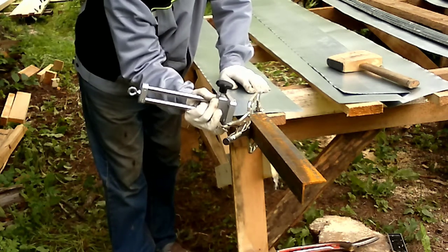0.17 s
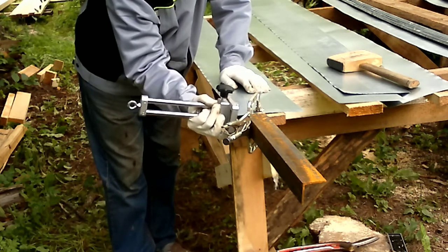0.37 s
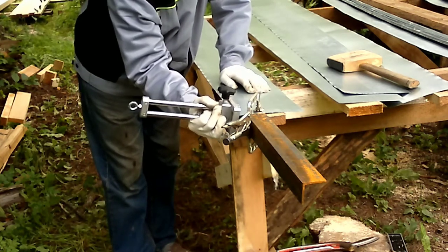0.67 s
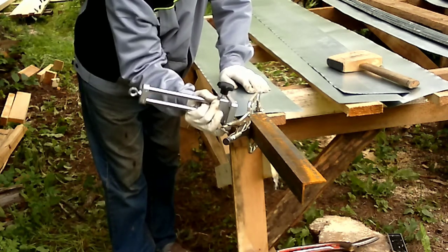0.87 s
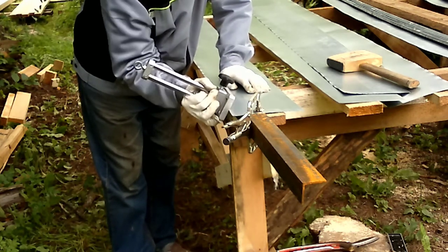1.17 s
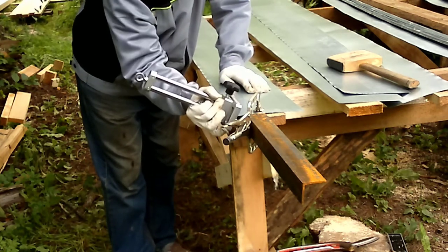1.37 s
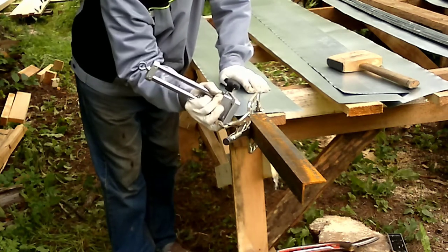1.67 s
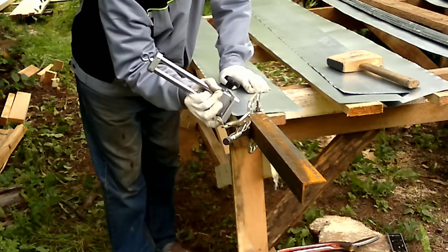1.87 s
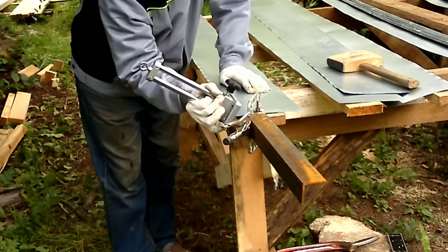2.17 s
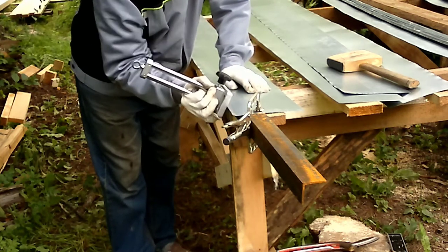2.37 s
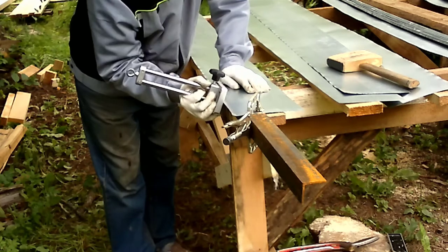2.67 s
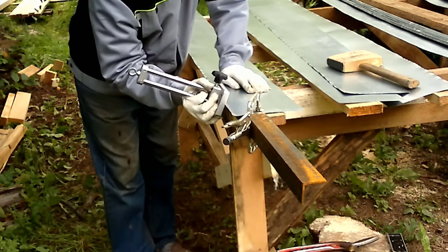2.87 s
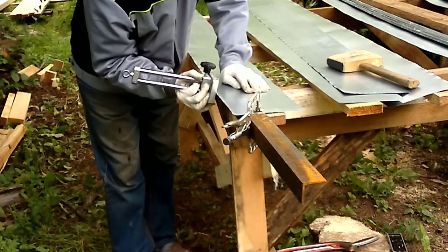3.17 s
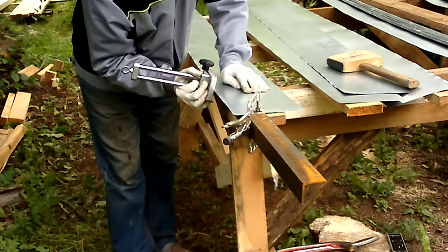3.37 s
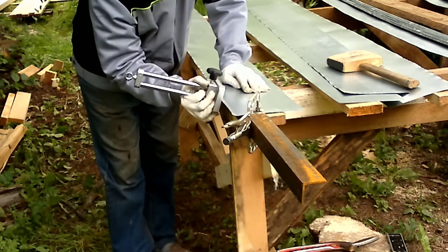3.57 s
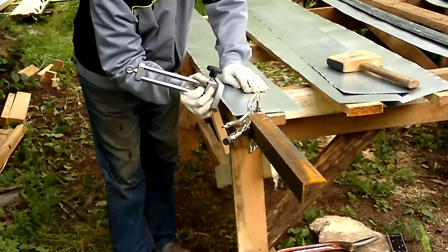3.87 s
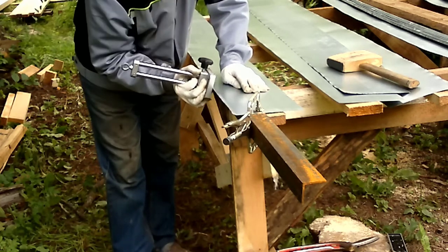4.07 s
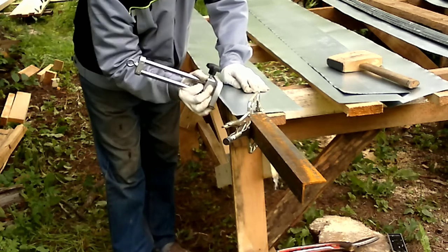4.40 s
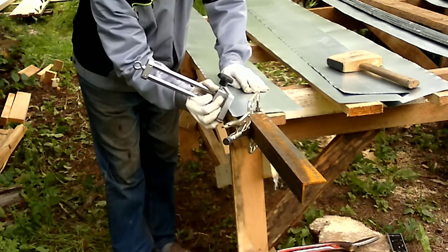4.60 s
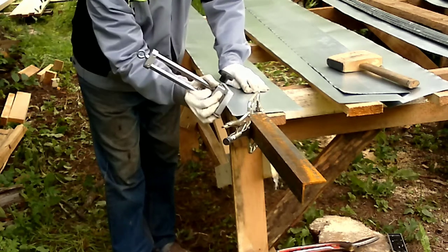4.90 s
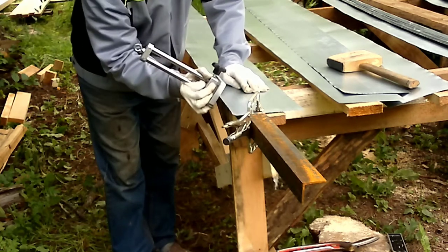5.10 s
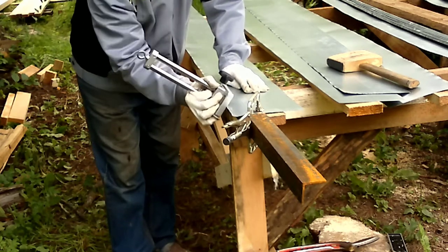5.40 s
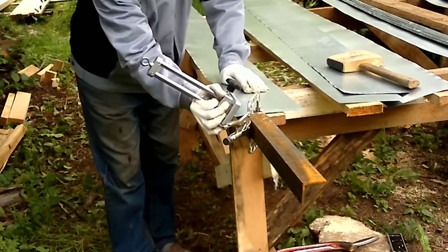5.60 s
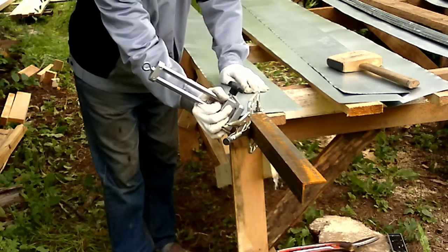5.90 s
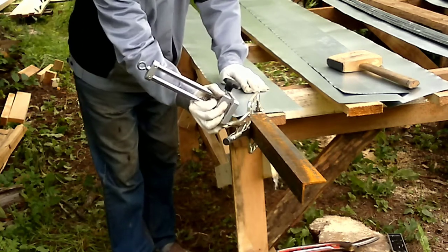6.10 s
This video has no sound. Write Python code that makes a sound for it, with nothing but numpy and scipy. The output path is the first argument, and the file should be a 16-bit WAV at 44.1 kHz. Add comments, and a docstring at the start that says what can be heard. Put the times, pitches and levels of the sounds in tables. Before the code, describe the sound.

Short, irregular scrapes sound up close as steel rollers bend the edge of a hand-damped metal sheet in the open air. The sheet knocks and the tool clicks with small, bright rings. After the lighter opening strokes the edge chafes hoarsely, then firmer pushes follow, with one low wind thump on the microphone. A sharp, ringing click marks the final stroke, over a steady faint hiss and low wind.

```python
"""An outdoor bench, one microphone close by: a hand roller bender works along a roofing sheet's edge.
Light wind rumbles under a soft hiss throughout. From 0.2 s the rollers rasp over the hand-damped sheet
in short strokes; the edge gives way in knocks and the tool's steel ticks and rings. Near 2.4 s the edge
chafes hoarsely on a roller flange. Harder pushes follow from 3.5 s, with a low wind thump at 4.3 s.
The last stroke, at 6.1 s, brings the loudest ring of the rollers."""
import sys
import numpy as np
from scipy import signal
from scipy.fft import rfft, irfft
from scipy.io import wavfile
from scipy.ndimage import uniform_filter1d

SR = 44100
rng = np.random.default_rng(int(sys.argv[2]) if len(sys.argv) > 2 else 0)


def master_out(mix):
    """Clip the mix to full scale and print it as 16-bit PCM to the path in sys.argv[1]."""
    frames = np.transpose(np.atleast_2d(mix))
    ceiling = np.clip(frames, -1, 1)
    pcm = np.round(ceiling * 32767).astype(np.int16)
    wavfile.write(sys.argv[1], SR, pcm)


N = 275625
TIME = np.arange(N) / SR

# open air around the bench: (frequency [Hz], level [dB per Hz])
AIR_SPECTRUM = [(100, 6.5), (200, 12.5), (480, 10.5), (700, 8), (1200, 2.5), (2300, -2), (5200, -5),
                (10000, -7.5), (15500, -13)]
# its hiss grows a little, then holds: (time [s], level [dB])
AIR_LEVELS = [(0, -62.5), (3.7, -58.5), (6.25, -58.5)]
# low wind: (frequency [Hz], level [dB per Hz])
WIND_SPECTRUM = [(12, -13), (25, -4.5), (47, -3.5), (70, -2.5), (112, -12.5), (200, -19.5), (500, -54),
                 (2000, -78)]
# low thumps of wind on the microphone: (time [s], level [dB], pitch [Hz], length [s])
WIND_THUMPS = [(1.917, -41.5, 44.5, 0.058), (4.304, -31.5, 39, 0.052)]
# the hand-damped sheet: (frequency [Hz], level [dB per Hz])
SHEET_SPECTRUM = [(46, -7.5), (96, -15), (186, -6), (390, -11.5), (475, -1), (765, -5.5), (905, -1.5),
                  (1760, -5), (2350, -7), (2700, -17), (3460, -19.5), (4360, -26.5), (6450, -33),
                  (15400, -46)]
# its strongest modes: (frequency [Hz], width [Hz], height [dB])
SHEET_RESONANCES = [(535, 45, 3), (671, 55, 5), (925, 40, 3), (1012, 42, 2), (1238, 52, 2), (1448, 62, 3),
                    (1658, 25, 3), (1760, 60, 2), (1937, 42, 3), (2255, 42, 4), (2528, 60, 3),
                    (2933, 80, 4)]
# the resonance that a sharp knock favours: (frequency [Hz], width [Hz], height [dB])
KNOCK_RESONANCE = [(1750, 1000, 8)]
# the tool's frame: (frequency [Hz], level [dB per Hz])
FRAME_SPECTRUM = [(1500, -52), (2880, -5), (3500, -14), (4000, 3.5), (4500, 7.5), (4880, -2), (5250, -3.5),
                  (5680, -4), (6380, -15), (8200, -8.5), (15400, -48)]
# its modes: (frequency [Hz], width [Hz], height [dB])
FRAME_RESONANCES = [(3800, 45, 3.4), (4500, 28, 4), (4330, 13, 3.1), (4330, 25, 3.7), (4650, 98, 6.3),
                    (4930, 60, 4.4)]
# a hard crack on steel: (frequency [Hz], level [dB per Hz])
CRACK_SPECTRUM = [(310, -76), (1250, 10.5), (3150, -8), (4450, -5.5), (6250, -10.5), (7050, -1.5),
                  (7850, -5.5), (9080, 2), (10050, -5), (11100, -18), (13100, -44), (16100, -16)]
# modes of the steel rollers: (frequency [Hz], level [dB], t60 before contact damping [s])
ROLLER_MODES = [(4255, -20, .13), (4525, -18, .12), (5577, -22, .09), (8560, -13, .06), (8638, -16, .1),
                (8912, -16, .09), (9049, 0, .062), (9054, -17, .17), (9110, -9, .04), (11650, -25, .07),
                (12710, -29, .08)]
# the edge drags on a flange: (time [s], length [s], start pitch [Hz], end pitch [Hz], level [dB])
FLANGE_CHAFES = [(0.824, 0.094, 1040, 1040, -54), (0.991, 0.037, 1840, 2000, -50),
                 (1.727, 0.073, 1670, 1970, -53), (2.312, 0.088, 1570, 1090, -39),
                 (2.404, 0.061, 1100, 930, -33), (2.683, 0.19, 1150, 1070, -65),
                 (3.119, 0.15, 2390, 1690, -51), (3.553, 0.042, 884, 1010, -32.5),
                 (4.62, 0.067, 1000, 820, -44.5), (4.943, 0.051, 880, 960, -49),
                 (5.329, 0.086, 1360, 1250, -36), (6.194, 0.03, 1390, 1280, -32)]
# steel meets steel in the tool: (time [s], relative level [dB], ring offset [dB])
STEEL_TICKS = [(0.2518, -34.5, -6), (0.9187, -25, 1.5), (0.9304, -37, 2), (0.9666, -37, 10),
               (1.3522, -31.5, -3), (1.3667, -35.5, -2), (1.6764, -29, 0), (1.711, -37, -3),
               (2.003, -42.5, -5), (2.2273, -26.5, 0.5), (2.243, -36, -8), (2.9748, -38.5, -3),
               (3.0893, -39.5, -7), (3.126, -39, -5), (3.528, -27.5, 3), (3.5756, -26, -3), (3.607, -34, 2),
               (3.6295, -28.5, 2), (3.666, -37.5, -7), (3.9408, -33, -9), (3.9628, -28.5, 2),
               (4.473, -30.5, 8), (5.3234, -37, -1), (5.3985, -28.5, -7), (5.4864, -26.5, -6),
               (5.4984, -24.5, 4.5), (5.564, -24.5, 4), (5.906, -41, -11), (6.0979, -16.5, 8.5),
               (6.1166, -19.5, 1), (6.15, -30, -4)]
# the edge gives way: (time [s], relative sheet level [dB], relative frame level [dB], sheet decay [s])
EDGE_KNOCKS = [(0.254, -34, -63, 0.011), (0.275, -43, -73, 0.0041), (0.858, -48.5, -70, 0.009),
               (0.92, -36, -38.5, 0.01), (0.93, -23.5, -54, 0.0061), (0.944, -25, -41, 0.0087),
               (0.974, -27.5, -62, 0.014), (1.356, -43, -58, 0.0045), (1.373, -32.5, -59, 0.0071),
               (1.678, -28, -40, 0.0063), (1.692, -23, -59, 0.018), (1.964, -45, -79, 0.0043),
               (1.983, -60, -70, 0.0055), (2.227, -27.5, -39, 0.0036), (2.243, -21.5, -39.5, 0.0073),
               (2.269, -38, -42.5, 0.0092), (2.289, -42, -50, 0.0065), (2.423, -26.5, -79, 0.019),
               (2.612, -41, -72, 0.01), (2.977, -39.5, -53, 0.006), (3.128, -27.5, -58, 0.012),
               (3.529, -27, -67, 0.02), (3.582, -32, -51, 0.0087), (3.61, -20.5, -59, 0.015),
               (3.628, -18.5, -46, 0.021), (3.902, -38, -60, 0.0043), (3.967, -20.5, -44.5, 0.02),
               (4.316, -35.5, -73, 0.015), (4.475, -23, -68, 0.01), (4.874, -50, -74, 0.0078),
               (5.503, -26, -36.5, 0.0094), (5.567, -38, -41.5, 0.006), (6.098, -33, -47, 0.01),
               (6.118, -17.5, -32.5, 0.013), (6.15, -42, -41, 0.0051), (6.166, -20, -69, 0.0078)]
# strokes of the rollers: (time of full grip [s], attack [s], hold [s], release [s], relative level [dB],
# swell over the hold [dB], sheet response at grip [Hz], sheet response at letting go [Hz])
ROLLER_PUSHES = [(0.217, .1, .055, 0.093, -44, 1, 860, 1070),
                 (0.922, 0.016, .057, .06, -32.5, 0, 1580, 1360),
                 (1.005, 0.018, 0.077, .3, -51.5, -2, 970, 735),
                 (1.307, .14, .08, .04, -42.5, 2.5, 1270, 1510),
                 (1.68, 0.012, 0.065, 0.08, -37, -6, 1250, 1750),
                 (1.973, 0.046, .057, .09, -45, -5, 1340, 1280),
                 (2.238, 0.022, 0.043, 0.089, -27, -3.5, 1660, 1810),
                 (2.363, 0.29, 0.082, .13, -39, 4.5, 1320, 1080),
                 (2.732, 0.15, 0.061, 0.091, -56.5, -0.5, 900, 920),
                 (2.997, .09, 0.068, 0.032, -44, 8, 1580, 1080),
                 (3.115, .14, .09, .12, -41, -6, 1700, 1930), (3.275, .15, 0.029, 0.16, -54, 1, 700, 640),
                 (3.569, .17, .095, .075, -30, -2, 1230, 1580),
                 (3.918, .08, .04, .05, -35, 1.5, 1320, 1350),
                 (3.97, 0.026, .14, 0.11, -28, -3.5, 1250, 1380),
                 (4.341, 0.081, .11, 0.11, -35.5, 2, 1300, 1360),
                 (4.494, 0.15, .168, 0.016, -27.5, -12, 1810, 1140),
                 (4.972, .12, .04, .11, -36, -5.5, 960, 1720),
                 (5.081, 0.053, 0.019, 0.11, -40.5, 0, 1520, 1470),
                 (5.34, 0.071, 0.11, 0.088, -39.5, -1.5, 1540, 1820),
                 (5.494, 0.11, 0.012, .07, -29, 2.5, 2100, 2080),
                 (5.569, 0.056, .008, 0.084, -36, -0.5, 1660, 1720),
                 (6.117, .016, 0.14, .1, -25, -12, 1880, 1290)]


def gain_of(db):
    """Decibels to amplitude."""
    return 10 ** (np.asarray(db) / 20)


def unit_rms(x):
    """Scales to rms 1."""
    return x / np.sqrt(np.mean(x ** 2) + 1e-20)


def add(mix, start_s, sound):
    """Lays a sound into the mix."""
    part = mix[max(round(start_s * SR), 0):][:len(sound)]
    part += sound[:len(part)]


def wobble(hz):
    """A smooth random curve of rms 1 that changes up to about hz times a second."""
    lowpass = np.exp(-(np.fft.rfftfreq(N, 1 / SR) / hz) ** 2)
    return unit_rms(irfft(rfft(rng.standard_normal(N)) * lowpass, N))


def body(spectrum, modes=(), size=8192):
    """Causal impulse response, of energy 1, with the given spectrum and resonances."""
    freqs = abs(np.fft.fftfreq(size, 1 / SR))
    knots_hz, levels = np.transpose(spectrum)
    db = np.interp(np.log(freqs + 1), np.log(knots_hz), levels)
    for hz, width, height in modes:
        db = db + height / (1 + (2 * (freqs - hz) / width) ** 2)
    minimum_phase = np.exp(signal.hilbert(np.log(gain_of(db))).conj())
    response = np.fft.ifft(minimum_phase).real[:size // 2]
    return response / np.linalg.norm(response)


def through(x, response):
    """Passes a sound through a response."""
    return signal.fftconvolve(x, response)[:len(x)]


def resonate(x, hz, width_hz):
    """A resonance that follows the curve hz: shift down to zero, smooth twice, shift back."""
    carrier = np.exp(2j * np.pi * np.cumsum(hz) / SR)
    pole = np.exp(-np.pi * width_hz / SR)
    smoothed = signal.lfilter([(1 - pole) ** 2], [1, -2 * pole, pole * pole], x / carrier)
    return 2 * (carrier * smoothed).real


def rattle(response, rise_s, fall_s, size=8192):
    """A dying cluster of tiny impacts shakes a body; the loudest few milliseconds have rms 1."""
    t = np.arange(size) / SR
    envelope = (1 - np.exp(-t / rise_s)) * np.exp(-t / fall_s)
    sound = through(rng.standard_normal(size) * envelope, response)
    return sound / np.sqrt(uniform_filter1d(sound ** 2, size=256).max())


def outdoors(wind_db=-54, gust_db=2.9, stir_db=-1.2):
    """The bed of the place: a soft hiss of open air and lumpy low wind."""
    air_db = np.interp(TIME, *np.transpose(AIR_LEVELS))
    air = through(rng.standard_normal(N), body(AIR_SPECTRUM)) * gain_of(air_db)
    wind = through(rng.standard_normal(N), body(WIND_SPECTRUM)) * gain_of(wind_db)
    return air * gain_of(stir_db * wobble(hz=8.7)) + wind * gain_of(gust_db * wobble(hz=6))


def wind_thumps():
    """Low thumps of wind on the microphone, each a few slow cycles of pressure."""
    out = np.zeros(N)
    for start, level, hz, length in WIND_THUMPS:
        t = np.arange(0, length, 1 / SR)
        add(out, start, gain_of(level) * np.sin(np.pi * t / length) * np.sin(2 * np.pi * hz * t))
    return out


def yard(direct, wet_db=-18, t60=0.2, size=16384):
    """Close up the direct sound leads; the bench and stacked sheets scatter a brief faint tail."""
    t = np.arange(size) / SR
    tail = rng.standard_normal(size) * gain_of(-60 * t / t60) * (1 - np.exp(-t / 0.0087))
    return direct + gain_of(wet_db) * through(direct, tail / np.linalg.norm(tail))


def chafes(width_hz=260):
    """The edge drags on a flange and sings in one narrow resonance that slides with the pressure."""
    out = np.zeros(N)
    for start, length, start_hz, end_hz, level in FLANGE_CHAFES:
        drag = rng.standard_normal(16384)[:round(length * SR)]
        tone = resonate(drag, np.linspace(start_hz, end_hz, len(drag)), width_hz)
        add(out, start, gain_of(level) * unit_rms(tone) * signal.windows.tukey(len(drag), 0.7))
    return out


def stray_ticks(push_db, tick_db=-46, scatter_db=2, ring_db=-1, count=12):
    """Faint ticks fall by chance, more often the harder the push; rows as in STEEL_TICKS."""
    chance = gain_of(push_db)
    times = rng.choice(TIME, count, p=chance / chance.sum())
    return [(start, tick_db + scatter_db * rng.standard_normal(), ring_db) for start in times]


def ticks(rows, crack_db=-10, ring_db=-9.5, size=8192):
    """Steel cracks on steel and the rollers ring; each contact weights, detunes and damps them anew."""
    out, t = np.zeros(N), np.arange(size) / SR
    steel = body(CRACK_SPECTRUM)
    hz, mode_db, t60 = np.transpose(ROLLER_MODES)[:, :, None]
    for start, level, ring_offset in rows:
        weight, phase, detune = rng.standard_normal((3, len(ROLLER_MODES), 1))
        damping = rng.uniform(1.1, 1.9)
        strength = gain_of(mode_db + 2.5 * weight - 60 * damping * t / t60)
        modes = strength * np.sin(2 * np.pi * (hz * (1 + 0.0015 * detune) * t + phase))
        ringing = gain_of(ring_db + ring_offset) * modes.sum(0) * (1 - np.exp(-t / 0.003))
        crack = gain_of(crack_db) * rattle(steel, rise_s=0.00013, fall_s=0.0044)
        add(out, start, gain_of(level) * (crack + ringing))
    return out


def knocks(sheet_trim_db=-8, frame_trim_db=-3):
    """Each give of the edge jolts the sheet and sets the frame of the tool ringing."""
    out = np.zeros(N)
    sheet = body(SHEET_SPECTRUM, SHEET_RESONANCES + KNOCK_RESONANCE)
    frame = body(FRAME_SPECTRUM, FRAME_RESONANCES)
    for start, sheet_db, frame_db, decay in EDGE_KNOCKS:
        add(out, start, gain_of(sheet_db + sheet_trim_db) * rattle(sheet, rise_s=0.00027, fall_s=decay))
        add(out, start, gain_of(frame_db + frame_trim_db) * rattle(frame, rise_s=0.00053, fall_s=0.02))
    return out


def pushing(ramp_db=30, dull_oct_per_db=0.04):
    """Each push builds, holds and lets go; returns level [dB] and centre of the sheet's response [Hz]."""
    power = 1e-12
    weighted_hz = power * ROLLER_PUSHES[0][6]  # start at the first grip's frequency
    for grip, attack, hold, release, level, swell, grip_hz, end_hz in ROLLER_PUSHES:
        t = TIME - grip
        travel = np.clip(t / hold, 0, 1)
        slack_db = ramp_db * (np.maximum(-t, 0) / attack + np.maximum(t - hold, 0) / release)
        slack_db = np.minimum(slack_db, 120)
        share = gain_of(level + swell * travel - slack_db) ** 2
        contact_hz = grip_hz + (end_hz - grip_hz) * travel
        dulling = 2 ** (-dull_oct_per_db * slack_db)  # a lighter contact answers lower in the sheet
        power = power + share
        weighted_hz = weighted_hz + share * contact_hz * dulling
    return 10 * np.log10(power), weighted_hz / power


def slips(scatter_db=2.0, per_s=12000):
    """Countless small slips of uneven size under the rollers."""
    impulses = rng.standard_normal(N) * (rng.random(N) < per_s / SR)
    return impulses * gain_of(scatter_db * rng.standard_normal(N))


def shifting_modes(x, depth_db=3.2):
    """The moving contact crosses nodes and bellies, so groups of modes swell and fade in turn."""
    spectra = signal.stft(x, nperseg=1024, noverlap=768)[2]
    drift = uniform_filter1d(rng.standard_normal(spectra.shape), size=9, axis=1)  # smooth in time
    patches = unit_rms(uniform_filter1d(drift, size=4, axis=0))  # and in frequency
    return signal.istft(spectra * gain_of(depth_db * patches), nperseg=1024, noverlap=768)[1][:N]


def rolling(push_db, centre_hz, spread_db=-11, grit_db=-31, judder_db=0.8, trim_db=-1.96):
    """Slips shake the sheet; the modes that answer most glide as the contact travels along the edge."""
    sheet = body(SHEET_SPECTRUM, SHEET_RESONANCES)
    focused = resonate(through(slips(), sheet), centre_hz, width_hz=950)
    spread = gain_of(spread_db) * through(slips(), sheet)
    rasp = shifting_modes(focused + spread)
    local_rms = np.sqrt(abs(uniform_filter1d(rasp ** 2, size=2200)) + 1e-12)
    specks = slips(scatter_db=3.0, per_s=1300)  # crushed against the steel
    grit = gain_of(grit_db) * unit_rms(through(specks, body(CRACK_SPECTRUM)))
    push = gain_of(push_db + trim_db + judder_db * wobble(hz=55))
    return push * (rasp / local_rms + grit)  # the push alone sets the power


def scene():
    """The tool on the sheet, close up in the open air, in mono."""
    push_db, centre_hz = pushing()
    tool = rolling(push_db, centre_hz) + chafes() + knocks() + ticks(STEEL_TICKS + stray_ticks(push_db))
    return (yard(tool) + wind_thumps() + outdoors())[None]


def record(dry, cutoff_hz=15900):
    """The microphone chain cuts off the highest treble."""
    lowpass = signal.firwin(511, cutoff_hz, window=("kaiser", 9), fs=SR)
    return signal.oaconvolve(dry, lowpass[None], "same")


dry = scene()
out = record(dry)
master_out(out)
```